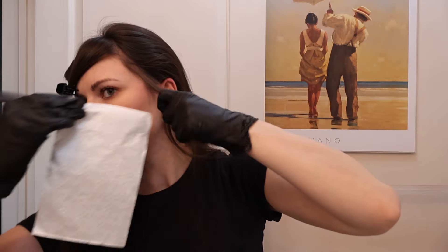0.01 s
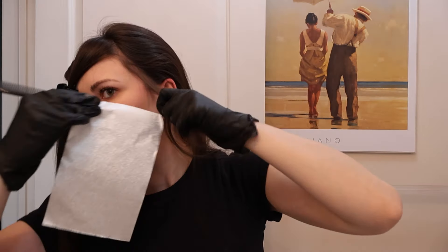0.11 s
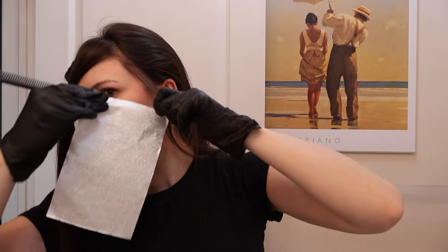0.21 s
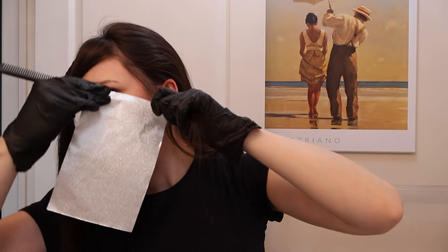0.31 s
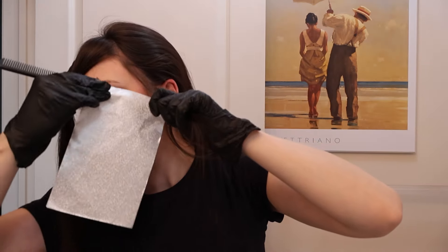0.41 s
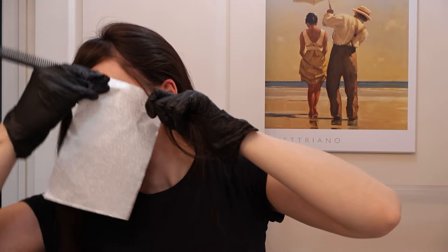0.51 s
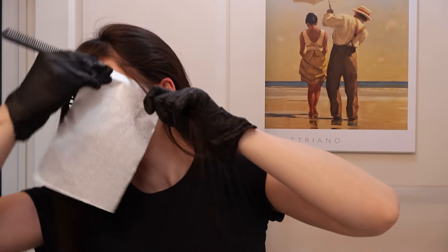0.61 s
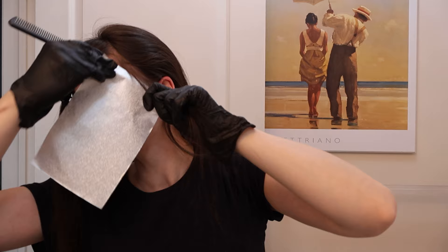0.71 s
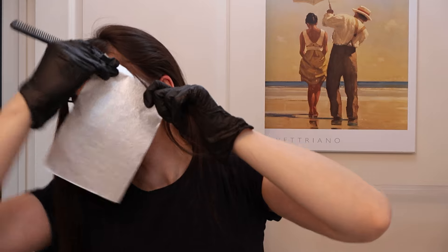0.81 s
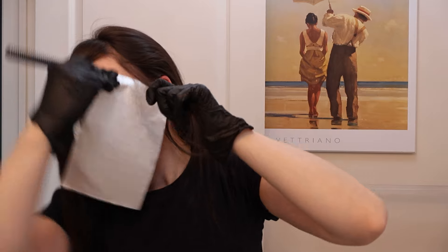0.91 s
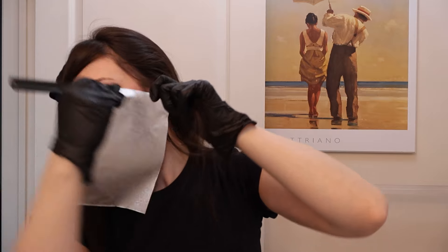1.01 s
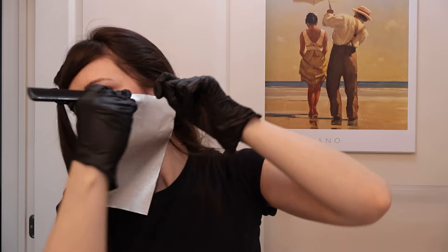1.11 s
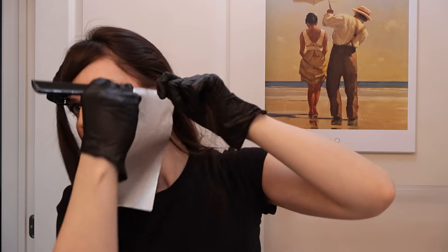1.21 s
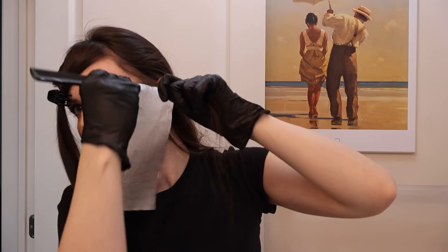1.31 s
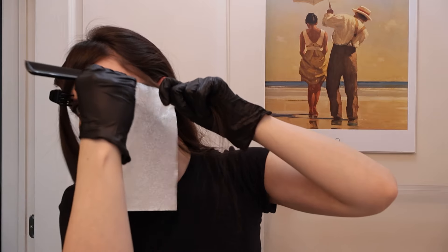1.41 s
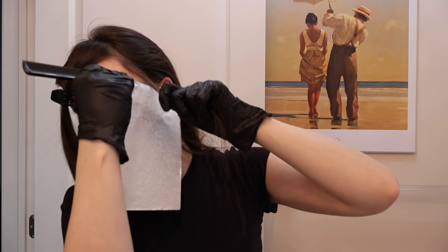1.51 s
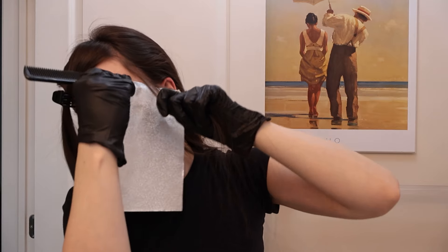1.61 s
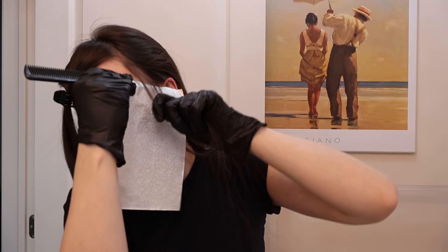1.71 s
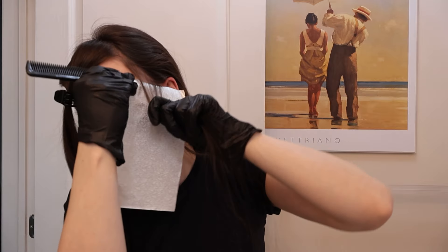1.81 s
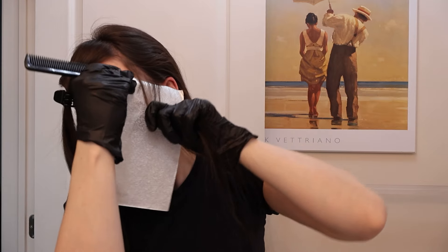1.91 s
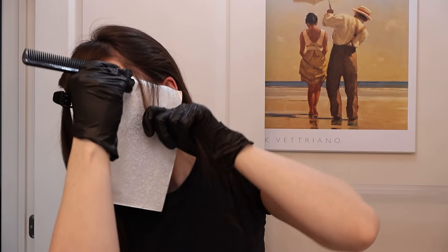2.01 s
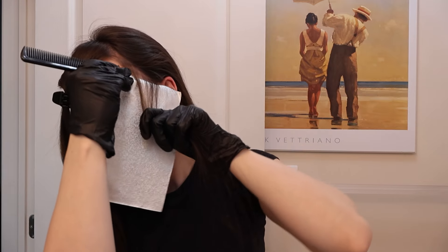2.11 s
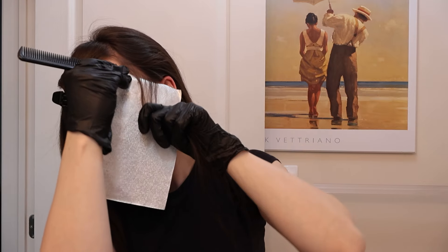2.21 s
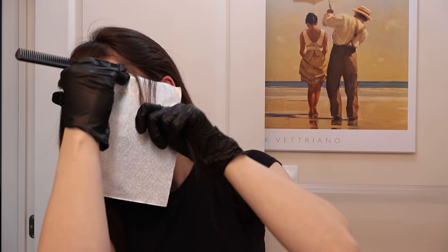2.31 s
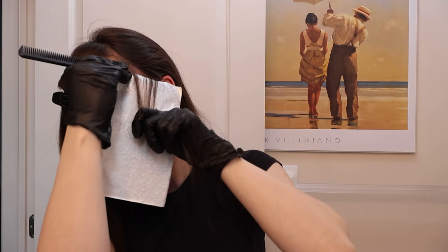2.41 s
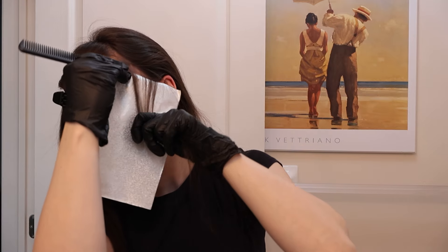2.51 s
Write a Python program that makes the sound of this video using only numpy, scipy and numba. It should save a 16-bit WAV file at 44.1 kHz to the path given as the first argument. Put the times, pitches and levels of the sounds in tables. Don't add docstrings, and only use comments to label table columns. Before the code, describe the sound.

Thin aluminium foil crinkles in gloved hands, close and nearly mono. A bright sharp snap with ringing crackle comes at 0.23 s, another at 0.5, then rustling and sliding to 0.9. A strong pop at 1.05 starts dense crackles and buckles until about 1.8. A duller pop and soft glove pat fall near 2.1, then faint rustles. Short hard bathroom tail, light hiss, low rumble.

```python
import sys
import numpy as np
from scipy import signal
from scipy.fft import rfft, irfft
from scipy.io import wavfile
from numba import njit

SR = 44100
rng = np.random.default_rng(int(sys.argv[2]) if len(sys.argv) > 2 else 0)


def undo_db(level):
    steps = np.asarray(level, float) / 20
    return 10 ** steps


def file_out(sig):
    cols = np.atleast_2d(sig).T
    lim = np.clip(cols, -1, 1)
    pcm = np.round(lim * 32767).astype(np.int16)
    wavfile.write(sys.argv[1], SR, pcm)


N = 114660


def level(x, db):
    return x * undo_db(db) / np.sqrt(np.mean(x ** 2))


def colour(x, points):
    point_hz, point_db = np.array(points, float).T
    hz = np.maximum(np.arange(2049) * SR / 4096, 5)
    log_gain = np.interp(np.log(hz), np.log(point_hz), point_db) * np.log(10) / 20
    cepstrum = irfft(log_gain)
    cepstrum[1:2048] *= 2
    cepstrum[2049:] = 0
    response = irfft(np.exp(rfft(cepstrum)))
    return signal.fftconvolve(x, response)[:N]


@njit
def grains(length, start, hz, t60, size):
    y = np.zeros(length)
    for k in range(len(start)):
        turn = np.exp(2j * np.pi * hz[k] / SR - np.log(1000) / (t60[k] * SR))
        z, onset, quick = size[k] + 0j, 1., np.exp(-2 * hz[k] / SR)
        for i in range(start[k], min(length, start[k] + int(t60[k] * SR) + 1)):
            y[i] += z.imag * (1 - onset)
            onset *= quick
            z *= turn
    return y


def swell(t, peak_s, db, rise_ms, fall_ms):
    rising = (peak_s - t) / max(rise_ms, 3)
    falling = (t - peak_s) / max(fall_ms, 10)
    distance = 1000 * np.where(t < peak_s, rising, falling)
    return undo_db(db - 20 * (np.sqrt(distance ** 2 + 0.003) - 0.1669))


def swarm(count, scatter_db):
    u = rng.random((count, 4))
    size = undo_db(-scatter_db * np.log(1 - .96 * u[:, 1])) * rng.choice([-1., 1.], count)
    return u[:, 0] * N / SR, size / np.sqrt(np.mean(size ** 2)), u[:, 2], rng.standard_normal(count)


def creases(gain_at, points):
    t, size, u, walk = swarm(count=32000, scatter_db=1.5)
    flicker_db, flickers_per_s = 1.5, 45
    size = size * undo_db(flicker_db * np.interp(t * flickers_per_s, np.arange(400), walk[:400]))
    hz = 300 + u * 15700
    t60 = 3.2 / np.sqrt(hz * 6000)

    def crackle(gain):
        snaps = grains(N, (t * SR).astype(int), hz, t60, size * gain / np.sqrt(t60))
        return colour(snaps, points)

    return crackle(gain_at(t)) / np.std(crackle(0.99))


def folds(table, cycles, octaves, rise, count):
    out = 0
    for peak_s, db, centre_hz, length_ms in table:
        t, size, _, spread = swarm(count, scatter_db=2)
        t = np.clip(peak_s + (t * SR / N - .4) * .3, 0, None)
        hz = np.clip(centre_hz * 2 ** (octaves * spread), 60, 15000)
        t60 = cycles / hz
        gain = swell(t, peak_s, db, rise * length_ms, length_ms)
        size = size * gain * np.sqrt(hz / centre_hz / (t60 * count / 8))
        out = out + grains(N, (t * SR).astype(int), hz, t60, size)
    return out


# hz, db (per Hz)
HISS = [(25, -5), (58, -2), (120, -5), (300, -6.5), (1000, -11), (3000, -24), (9000, -17.5), (16000, -16.5)]


def hiss():
    return level(colour(rng.standard_normal(N), HISS), -57.5)


# hz, db (per Hz)
SIDE_COLOUR = [(12, -30), (20, 0), (134, -5), (1660, -23.5), (2530, -21), (5530, -22.5), (14700, -22.5),
               (16000, -29)]


def rumble():
    return level(colour(rng.standard_normal(N), SIDE_COLOUR), -71.5)


# time_s, level_db
SLIDE = [(0.0, -47), (0.13, -49.5), (0.31, -62.5), (0.55, -50.5), (0.69, -37), (0.81, -37), (1.05, -47.5),
         (1.53, -47.5), (1.87, -47), (2.14, -49), (2.4, -49.5), (2.6, -49)]
# hz, db (per Hz)
SLIDE_COLOUR = [(300, -6.5), (700, -6), (1500, -5), (2700, -2.5), (5600, 0), (9000, -6), (16000, -9.5)]


def slide():
    time_s, level_db = np.array(SLIDE).T
    return creases(lambda t: undo_db(np.interp(t, time_s, level_db) - 4.5), SLIDE_COLOUR)


# start_s, peak_db, pitch_hz
TICKS = [(.0662, -36, 6000), (.216, -16, 6200), (.2307, -7, 8500), (.2309, -13, 3800), (.496, -22, 8900),
         (.5058, -15, 8900), (.5078, -21, 12500), (.5062, -20, 5300), (.6835, -28, 2300), (.782, -29, 5000),
         (1.016, -31, 8500), (1.0527, -22, 8600), (1.113, -13, 3300), (1.2214, -23, 2900),
         (1.3075, -17, 2350), (1.605, -27, 3000), (1.7572, -19, 8700), (1.7574, -25, 4200),
         (1.8645, -25, 8300), (2.009, -33, 8200)]


def ticks():
    start_s, peak_db, hz = np.array(TICKS).T
    start = (start_s * SR).astype(int)
    out = 0
    for ratio, share in ((1, .8), (.62, .4), (1.4, .3)):
        out = out + grains(N, start, hz * ratio, 9 / hz, undo_db(peak_db) * share)
    return out


# peak_s, level_db, rise_ms (per 20 dB), fall_ms (per 20 dB)
RUSTLES = [(.067, -48, 10, 16), (0.204, -34.5, 0, 40), (0.214, -32.5, 11, 22), (0.232, -30.5, 17, 24),
           (0.495, -41.5, 0, 34), (0.507, -34, 6, 16.5), (0.612, -36.5, 40, 20), (0.63, -34.5, 32, 19),
           (.655, -39.5, 30, 54), (.703, -41, 33, 27), (.745, -40.5, 29, 25), (.765, -48, 30, 70),
           (0.828, -38.5, 22, 23), (0.945, -39.5, 1, 94), (1.015, -43.5, 27, 67), (1.113, -45, 4, 40),
           (1.146, -42.5, 28, 35), (1.319, -41, 88, 138), (1.422, -33, 72, 30), (1.437, -35.5, 20, 40),
           (1.46, -40, 30, 60), (1.518, -34, 57, 44), (1.605, -43, 8, 46), (1.633, -40.5, 52, 60),
           (1.71, -43, 36, 96), (1.757, -37.5, 1, 12), (1.783, -45, 56, 45), (1.863, -39.5, 24, 59),
           (2.008, -43, 8, 26), (2.39, -47.5, 49, 82), (2.461, -47, 67, 39), (2.59, -51, 77, 98)]
# hz, db (per Hz)
RUSTLE_COLOUR = [(300, -26), (1300, -14), (2300, -3), (3800, -4), (5500, 1.5), (9000, -1.5), (16000, -1.5)]


def rustle():
    return creases(lambda t: np.sqrt(sum(swell(t, *r) ** 2 for r in RUSTLES)), RUSTLE_COLOUR)


# peak_s, level_db, centre_hz, length_ms (per 20 dB)
FLEXES = [(0.099, -50.5, 5000, 120), (.215, -34, 2400, 15), (.243, -31.5, 2280, 32),
          (.285, -40.5, 1800, 60), (0.497, -47, 2320, 32), (.625, -39, 5400, 25), (0.711, -37, 5100, 90),
          (.78, -46, 5000, 66), (0.831, -41, 5000, 27), (0.898, -48, 4400, 68), (1.019, -48, 1220, 62),
          (1.083, -33.5, 1870, 52), (1.112, -29, 2940, 11), (1.141, -34.5, 3070, 54),
          (1.172, -33.5, 2420, 53), (1.25, -43, 2450, 88), (1.36, -39.5, 2670, 74),
          (1.438, -36.5, 2190, 64), (1.512, -35, 2650, 78), (1.572, -33.5, 2240, 59),
          (1.62, -42.5, 2400, 77), (1.782, -46.5, 2330, 114), (2.095, -41.5, 3320, 42),
          (2.18, -47, 1780, 39), (2.395, -45, 1950, 51), (2.461, -48.5, 2780, 54), (2.54, -46, 1300, 54)]


def flex():
    return folds(FLEXES, cycles=4.63, octaves=0.67, rise=0.87, count=1500)


# peak_s, level_db, pitch_hz, length_ms (per 20 dB)
RINGS = [(.232, -33, 1375, 28), (.275, -46, 1500, 30), (.25, -48, 704, 30), (.243, -37, 2150, 22),
         (.245, -41, 6300, 20), (.208, -44, 1375, 25), (.507, -42, 5300, 25), (.506, -44, 2250, 16),
         (.53, -53, 2400, 25), (.59, -51, 2450, 45), (.615, -44, 8600, 40), (.626, -40, 5200, 20),
         (.69, -43, 2400, 35), (.68, -45, 4900, 80), (.74, -44, 8600, 30), (.745, -44, 4900, 70),
         (.78, -44, 5300, 20), (1.012, -48, 1280, 28), (1.06, -43, 1360, 60), (1.118, -38, 2950, 40),
         (1.308, -37, 2320, 30), (1.4, -44, 2950, 60), (1.44, -42, 2210, 50), (1.5, -41, 2900, 60),
         (1.572, -41, 2850, 40), (1.603, -36, 2800, 20), (1.42, -42, 8900, 50), (1.63, -44, 8800, 50),
         (1.57, -46, 1300, 45), (2.078, -42, 2545, 15), (2.095, -53, 1170, 20), (2.535, -57, 960, 30)]


def taut_patches():
    return folds(RINGS, cycles=29, octaves=0.024, rise=0.38, count=300)


# start_s, level_db, centre_hz, fall_ms (per 20 dB)
BUCKLES = [(.2305, -19, 1680, 50), (0.505, -26, 2330, 22), (0.683, -23, 2110, 28), (1.0529, -14, 3070, 43),
           (1.099, -25, 2300, 30), (1.109, -21, 3100, 40), (1.112, -16, 3010, 55), (1.166, -28.5, 2700, 70),
           (1.2213, -22.5, 2730, 37), (1.3067, -18, 2530, 48), (1.435, -30, 1880, 27),
           (1.557, -27, 1900, 37), (1.7569, -32, 3250, 13), (2.0447, -31, 4600, 25),
           (2.0748, -21.5, 2670, 45), (2.167, -41.5, 1500, 45), (2.385, -43, 1320, 42),
           (2.531, -43.5, 1210, 38)]


def buckle():
    count, knocks = 600, 12
    is_knock = np.arange(count) < knocks
    out = 0
    for start_s, db, centre_hz, fall_ms in BUCKLES:
        t, size, u, spread = swarm(count, scatter_db=2)
        late_s = t * SR / N * .12
        late_s[:knocks] = u[:knocks] * .001
        spread[:knocks] = np.linspace(-.9, .9, knocks)
        tail = size * undo_db(-2 - 2e4 * late_s / max(fall_ms, 10))
        gain = np.where(is_knock, np.sign(size), tail)
        hz = np.clip(centre_hz * 2 ** (0.49 * spread), 150, 15000)
        size = 0.37 * undo_db(db) * gain * (hz / centre_hz) ** 1.03
        out = out + grains(N, ((start_s + late_s) * SR).astype(int), hz, 9.9 / hz, size)
    return out


# peak_s, level_db, centre_hz, length_ms (per 20 dB)
THUMP = [
    (.243, -57, 241, 37),
    (.51, -55.5, 715, 32),
    (2.09, -49, 620, 16),
]


def thump():
    return folds(THUMP, cycles=8.9, octaves=0.59, rise=0.29, count=200)


def sheet(x):
    return signal.sosfilt(signal.butter(3, 319, "high", fs=SR, output="sos"), x)


def room(x):
    t60_s, treble_t60_s, split_hz, tail_db = 0.41, 0.22, 2060, -7
    t = np.arange(SR // 2) / SR
    echoes = rng.standard_normal(len(t)) * np.minimum(t / 0.0059, 1)
    low = signal.sosfilt(signal.butter(1, split_hz, fs=SR, output="sos"), echoes)
    tail = low * undo_db(-60 * t / t60_s) + (echoes - low) * undo_db(-60 * t / treble_t60_s)
    return signal.fftconvolve(x, tail * undo_db(tail_db) / np.sqrt(np.sum(tail ** 2)))[:N]


# hz, db
MIC = [(60, 11.5), (1000, 2), (2400, 0.5), (7600, -0.5), (8800, 4), (10500, -4.5), (12500, -1), (15800, -6)]


def scene():
    foil = sheet(rustle() + slide() + (flex() + taut_patches()) + buckle() + ticks()) + thump()
    mid = colour(foil + room(foil), MIC) + hiss()
    side = rumble() + undo_db(-31.5) * np.roll(mid, 9)
    return np.array([mid + side, mid - side])


def band_limit(x):
    return signal.sosfilt(signal.butter(12, 15840, fs=SR, output="sos"), x)


def record(dry):
    top_cut = signal.ellip(10, .2, 80, 15830, fs=SR, output="sos")
    mix = signal.sosfilt(top_cut, dry)
    return band_limit(mix)


dry = scene()
out = record(dry)
file_out(out)
```